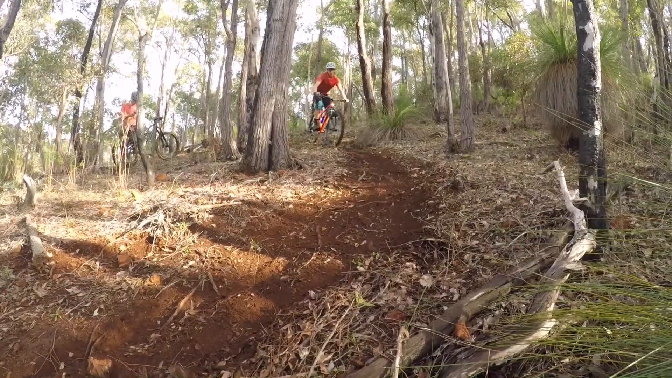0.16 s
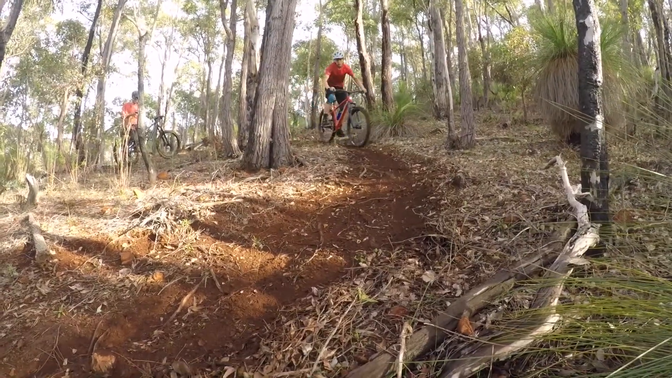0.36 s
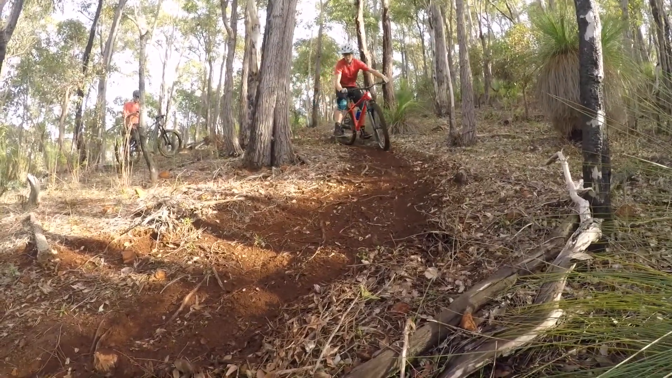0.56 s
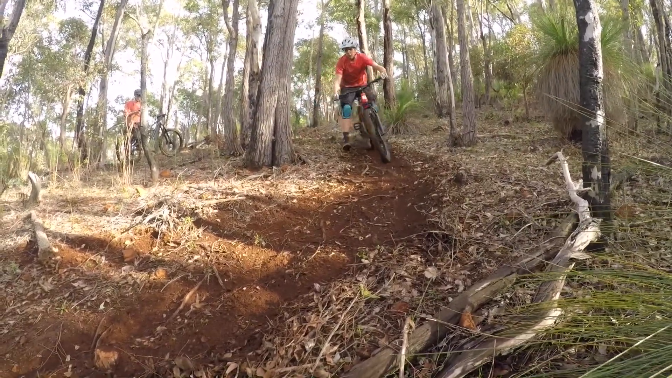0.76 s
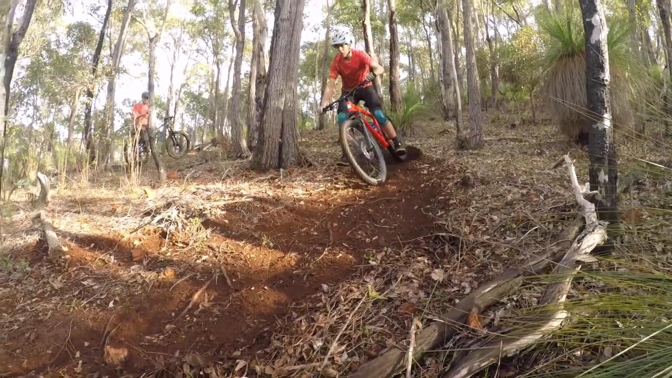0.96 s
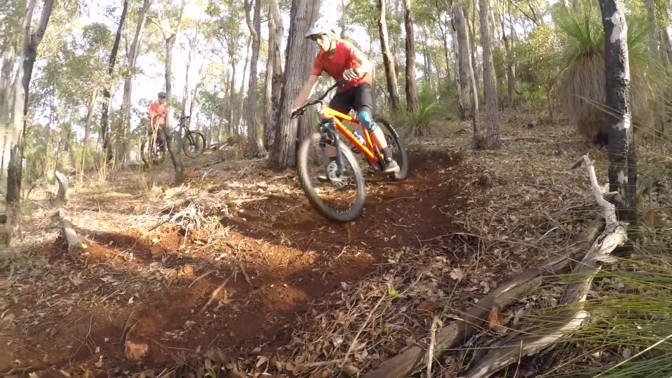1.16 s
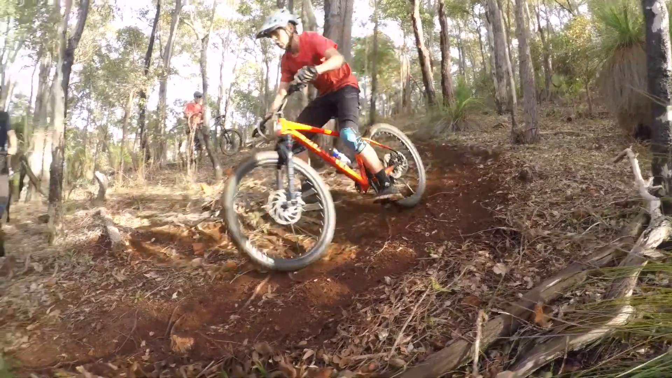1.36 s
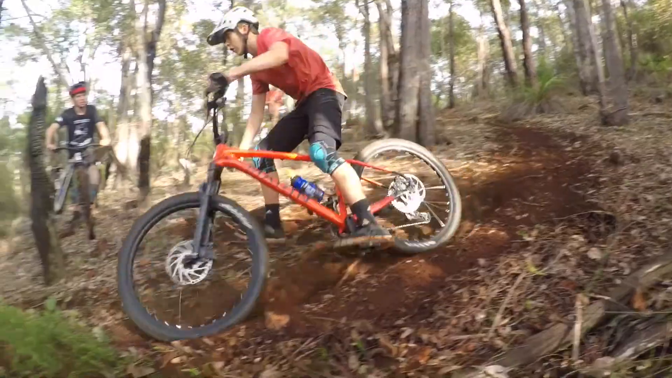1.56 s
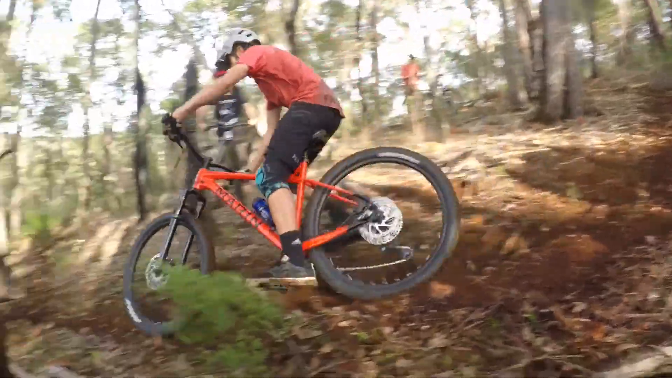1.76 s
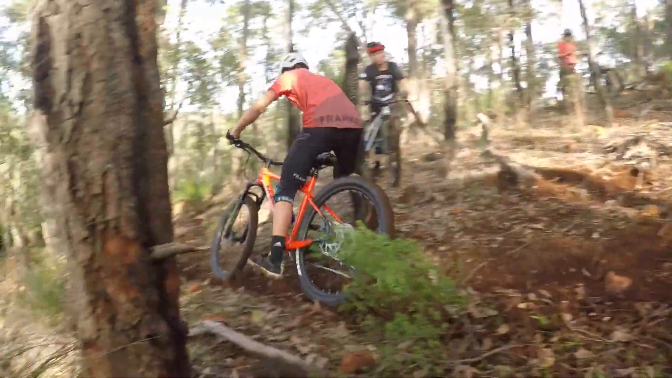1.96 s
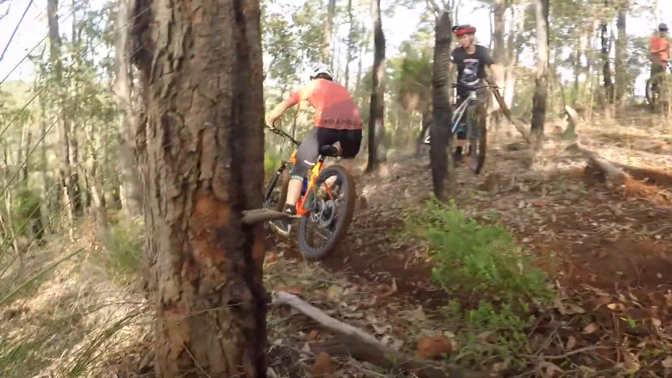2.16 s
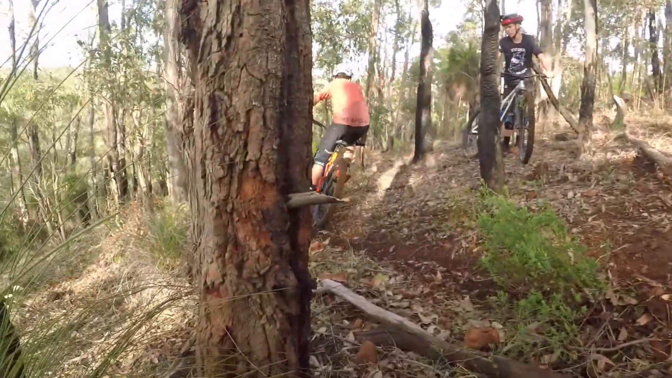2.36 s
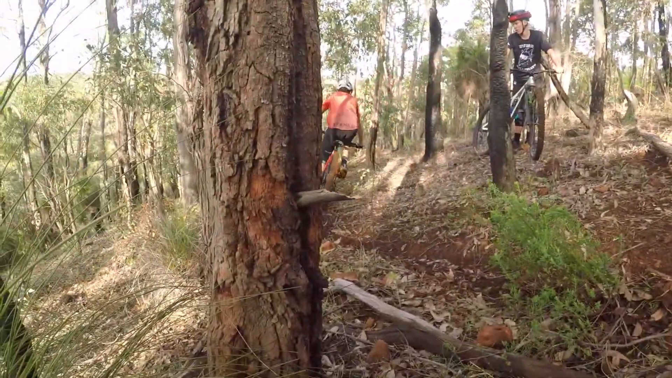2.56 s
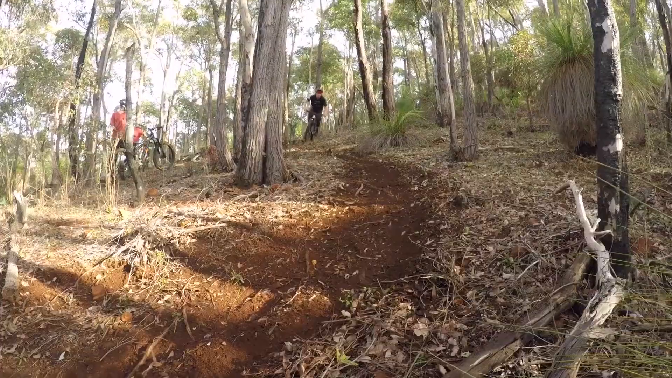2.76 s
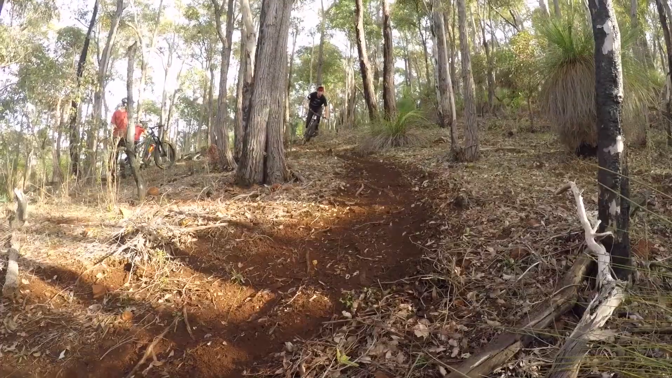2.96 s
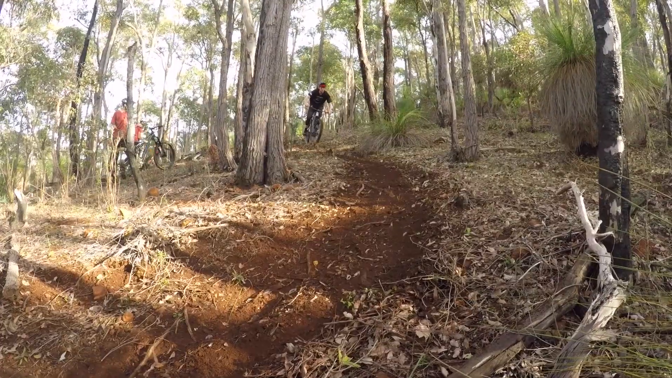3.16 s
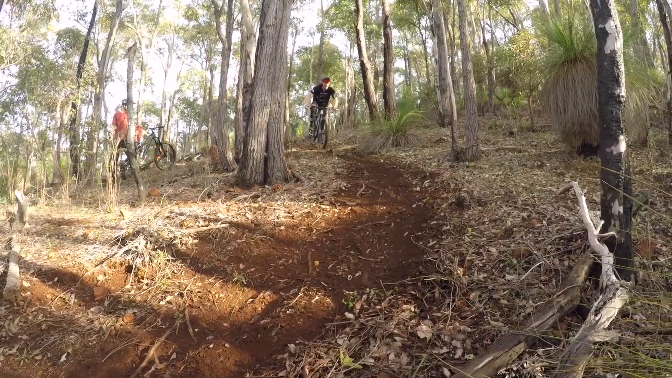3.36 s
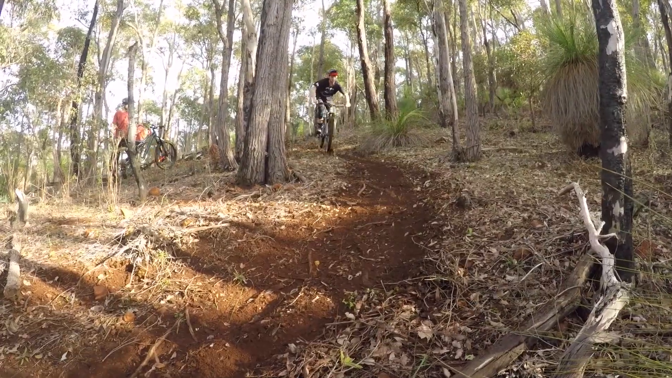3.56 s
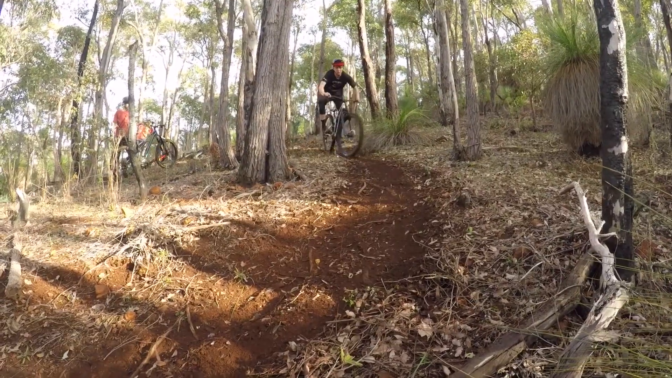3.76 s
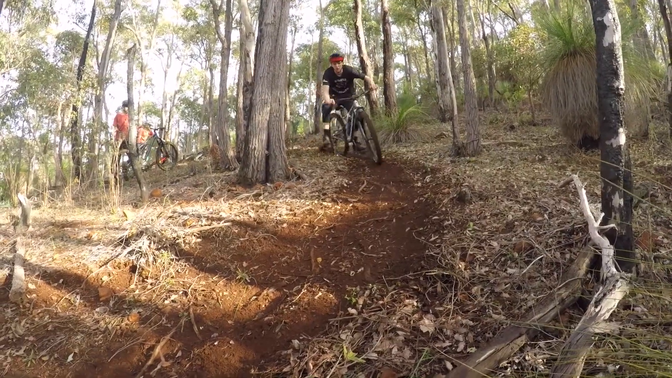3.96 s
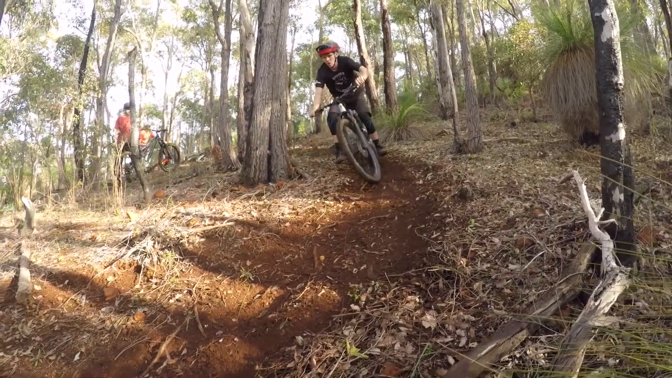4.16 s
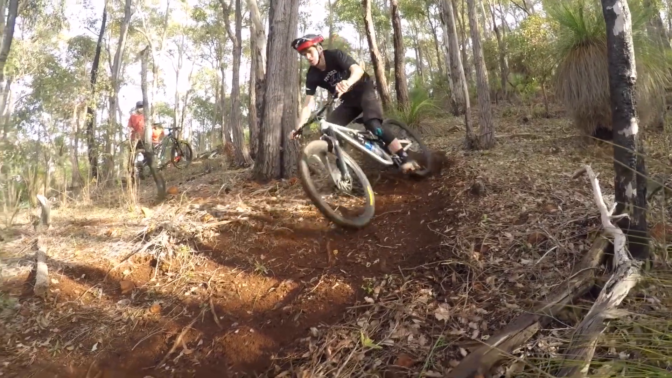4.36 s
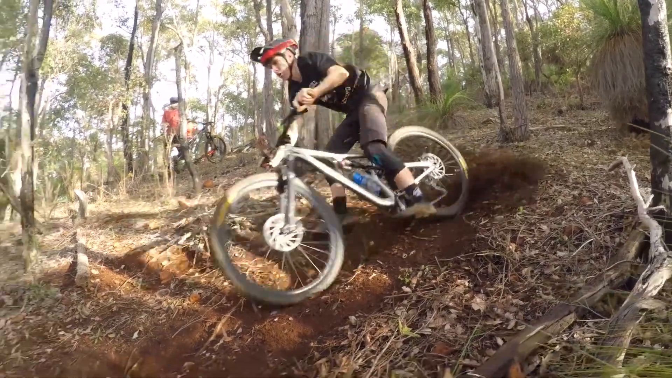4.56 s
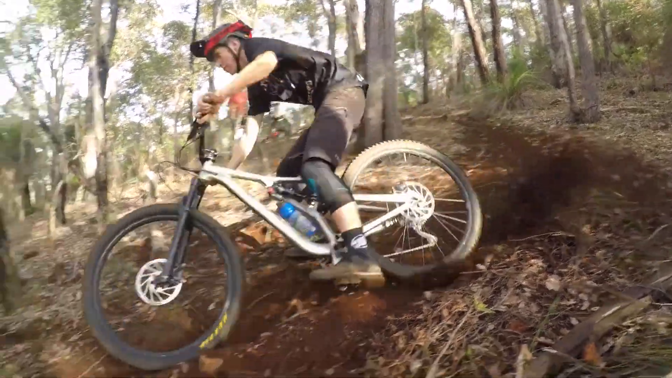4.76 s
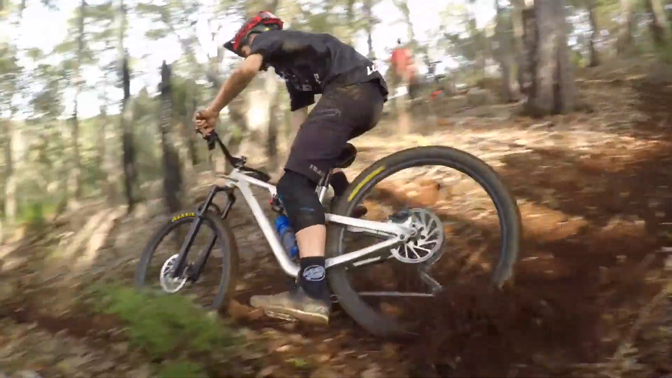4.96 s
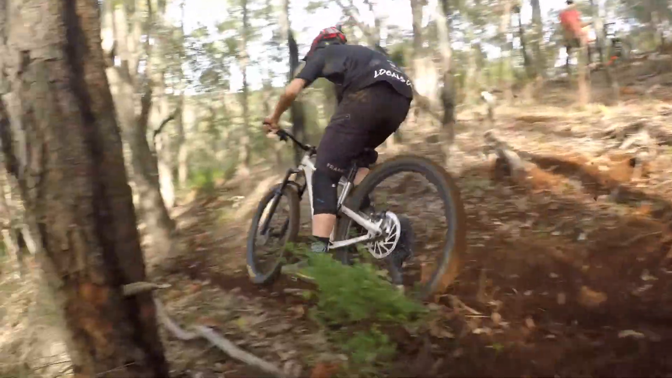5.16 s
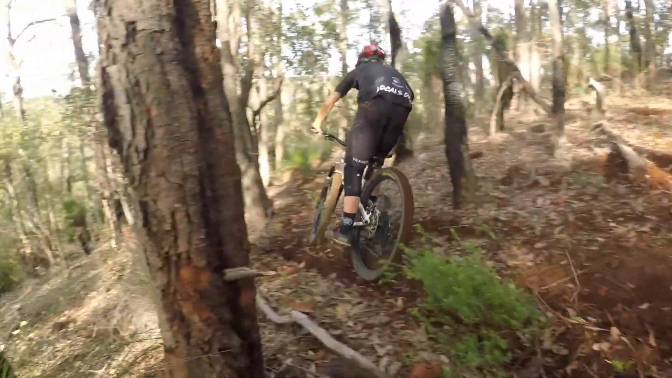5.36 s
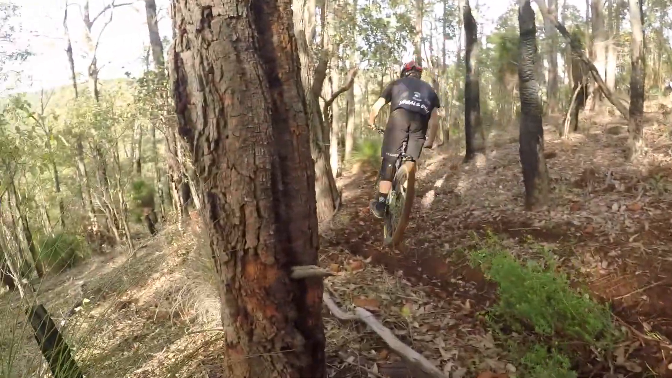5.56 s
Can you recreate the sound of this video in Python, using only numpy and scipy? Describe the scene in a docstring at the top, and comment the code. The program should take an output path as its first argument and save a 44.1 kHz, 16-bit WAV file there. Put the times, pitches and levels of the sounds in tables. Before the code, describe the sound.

Close outdoor sound on a dry forest trail, with low wind rumble on the microphone and faint leaf rustle. From 0 s a bike approaches with soft tyre noise and small chain clacks at 0.2-0.45 s. At about 1.1 s it swells fast: sharp frame clatter, wooden-sounding wheel knocks, thumps, cracking stones and gravelly crunch over low drumming, loudest from 1.2 to 1.9 s, with a very brief ringing wheel tone near 1.56 s. It drops quickly after 1.95 s, duller behind a trunk by 2.5 s, with one knock. At 2.63 s a click and a hundredth-second silence cut to near quiet. Sparse faint ticks lead to short gritty scrapes from 3.8 s; a second tyre skids past from 4.3 to 5.4 s, with knocks, hard clods and stones, and thick hissing soil spray strongest around 4.6-5.3 s. A short wind buffet hits at 5.2 s; spray thins to the end at about 5.6 s.

```python
"""Wind rumbles as a mountain bike drums over dirt and grit, then a second bike skids through the bend.
The tyres turn random tiny impacts into drumming, crunch and a spray of soil that swell as each bike passes.
Chain contacts, bumps and stones are short blows that ring; brakes, tread and a wheel give wavering tones.
Scrapes are short bursts of coloured grains, and wind is slow noise over rustling leaves.
A click and a very short silence part the two rides."""
import sys
import numpy as np
from scipy import signal
from scipy.fft import rfft, irfft, next_fast_len
from scipy.io import wavfile
from scipy.ndimage import uniform_filter1d, map_coordinates

SR = 44100
rng = np.random.default_rng(int(sys.argv[2]) if len(sys.argv) > 2 else 0)


def unload_audio(sound):
    """Save the sound as a 16-bit wav file, at the path given as the first command line argument."""
    columns = np.transpose(np.atleast_2d(sound))
    # keep every value between -1 and 1, then stretch to whole-number steps
    steps = np.round(np.clip(columns, -1, 1) * 32767)
    wavfile.write(sys.argv[1], SR, steps.astype(np.int16))


N = 247401  # length [samples]

# Event levels below are settings before the trims in the functions.
# Spectra give only a shape: they are scaled to unit power before use.

# Wind buffeting: (time [s], level [dB])
WIND_LEVEL = [(0.0, -37), (0.59, -38.5), (1.76, -28.5), (1.82, -35), (1.89, -26.5), (1.98, -45),
              (2.32, -39), (3.42, -43), (3.45, -35), (3.94, -43), (4.2, -32), (4.38, -36), (5.16, -32.5),
              (5.21, -20.5), (5.26, -37.5), (5.41, -44), (5.55, -26.5), (5.6, -45)]
# Wind rumble, then rustling leaves: (frequency [Hz], relative density [dB])
GUST_SPECTRUM = [(10, -5), (25, -5), (45, -5), (70, -10), (110, -15.5), (200, -34.5), (400, -39.5),
                 (1500, -64.5)]
LEAF_SPECTRUM = [(100, 15.5), (400, 5.5), (1000, -3), (2000, -3), (3300, -13.5), (4500, -9.5), (6200, -19),
                 (7300, -7.5), (9500, -4.5), (11500, -12.5), (15500, -56)]
HISS_DB = -87  # steady, very high hiss

# Each ride's tyres: (time [s], casing drumming [dB], tread crunch [dB], soil spray [dB])
FIRST_RIDE = [(0, -40, -50.5, -56), (0.3, -45.5, -48.5, -56), (0.4, -36.5, -42, -47.5),
              (0.58, -40, -42.5, -54.5), (0.94, -37, -42, -52), (1.15, -30.5, -43, -44.5),
              (1.23, -31.5, -33.5, -47), (1.33, -31, -28.5, -45.5), (1.395, -43, -37.5, -46),
              (1.445, -27, -29.5, -41), (1.48, -22.5, -29.5, -39.5), (1.525, -24, -32, -39),
              (1.58, -21, -31.5, -31.5), (1.635, -24.5, -36, -36), (1.7, -25.5, -31.5, -32),
              (1.725, -24, -33.5, -42.5), (1.8, -27, -39.5, -39), (1.88, -30, -32, -33),
              (1.94, -37, -42.5, -44), (2.03, -41.5, -48, -41), (2.11, -46, -47.5, -46),
              (2.27, -43, -45.5, -48), (2.4, -45, -49, -54), (2.62, -46, -47.5, -51.5)]
SECOND_RIDE = [(2.66, -49, -60, -64.5), (3.1, -48, -53, -60.5), (3.7, -42.5, -51, -58.5),
               (3.82, -42.5, -44, -53), (3.95, -39.5, -42.5, -56), (4.08, -34, -38, -49.5),
               (4.29, -32.5, -36, -48.5), (4.35, -31.5, -33, -40.5), (4.47, -32.5, -35.5, -39.5),
               (4.59, -27.5, -36, -36), (4.65, -34, -33, -33), (4.73, -33, -33, -34.5),
               (4.85, -27.5, -38.5, -31.5), (5.08, -32, -40.5, -32.5), (5.2, -32, -43, -31),
               (5.27, -32, -38, -28.5), (5.4, -35, -46, -37.5), (5.5, -39, -44.5, -42),
               (5.6, -36.5, -45, -42.5)]
# Tyre casing, firmer on the first bike: (frequency [Hz], relative density [dB])
FIRM_CASING = [(35, -37.5), (65, 5), (105, -1.5), (170, 2.5), (220, 1), (340, -16), (600, -29.5),
               (1500, -56)]
CASING = [(35, -18), (65, 4), (105, 0.5), (170, 0), (250, -1.5), (340, -14.5), (600, -33), (1500, -60)]
# Grinding tread of the first and second ride: (frequency [Hz], relative density [dB])
FIRST_TREAD = [(120, -31.5), (310, 0), (390, 7), (440, 0), (500, 2), (620, 1.5), (730, 0.5), (900, -6),
               (1060, -6), (1320, -3.5), (1700, -10.5), (3000, -19), (7000, -50), (15000, -61)]
SECOND_TREAD = [(120, -24), (300, -0.5), (400, -1), (530, 2.5), (640, 1), (740, -8), (880, -3.5),
                (1100, -6), (1350, -9), (1800, -12.5), (3000, -16.5), (7000, -26), (15000, -47)]
# Thin spray, thick spray and fine dust: (frequency [Hz], relative density [dB])
THIN_SPRAY = [(700, -15.5), (1500, 2), (2100, -1), (2600, 3), (3200, -2), (3700, 0.5), (4500, 1.5),
              (5300, -1), (6500, 0), (7500, -7), (9200, -10.5), (11000, -23), (15500, -33)]
THICK_SPRAY = [(500, -8.5), (1200, 5.5), (1700, 2.5), (2400, 1), (4000, 1.5), (5100, 3), (6100, 5),
               (6800, 4), (7600, -2.5), (9000, -4.5), (10300, -17.5), (11300, -19), (15500, -45)]
DUST_SPECTRUM = [(9000, -57), (11400, -17), (12200, -3), (13200, -7), (15500, -14), (17000, -28)]
NEAR_DUST_DB = 5  # fine dust is heard best while the rear wheel is close
# The first rider slips behind a trunk: (starts [s], half hidden [s], fully hidden [s])
BEHIND_TREE = (2.28, 2.39, 2.56)

# Chain and stones strike the frame; clank and brightness are relative to the level:
# (time [s], level [dB], clank [dB], brightness [dB], time to fall 60 dB [s])
CLACK_EVENTS = [(0.2054, -36.5, -20, -22, 0.052), (0.2625, -38.5, -2, -10.5, 0.029),
                (0.3555, -25.5, -6, -25.5, 0.05), (0.401, -26.5, -10, -28, 0.035),
                (0.447, -34.5, -13, -26, 0.07), (0.636, -36.5, -7, -28, 0.14),
                (0.987, -27.5, -15, -21, 0.066), (1.0106, -29.5, -7, -25, 0.25),
                (1.091, -22, -5.5, -45, 0.04), (1.1899, -16, -5, -28, 0.061),
                (1.3063, -40, -11, -10.5, 0.058), (1.5354, -10.5, -11, -22.5, 0.061),
                (1.5615, -18, -4, -20, 0.072), (1.651, -22, -27, -19, 0.079),
                (1.738, -20, -3.5, -20, 0.068), (1.7799, -26, -22, -16.5, 0.063),
                (1.853, -25, -9, -25, 0.11), (3.099, -46.5, -1, -12, 0.05), (3.117, -45, -1, -15, 0.073),
                (3.421, -42.5, -1, -13, 0.041), (3.8383, -35, -5, -21, 0.048),
                (4.196, -33.5, -23, -20, 0.15), (4.337, -26, -8, -18, 0.064),
                (4.9575, -23, -26, -16, 0.097), (5.4563, -25.5, -6.5, -20, 0.045)]
# Resonances of frame, lower clank and chain: (frequency [Hz], width [Hz], level [dB])
FRAME_MODES = [(2234, 380, -0.5), (2380, 106, 4), (2645, 190, 4.5), (3120, 790, -1.5), (3550, 66, -4),
               (3674, 34, 5.5), (3890, 170, 4), (4500, 500, -4)]
CLANK_MODES = [(1188, 52, 12.5), (1275, 126, 7), (1360, 190, 11), (1920, 1450, 0)]
CHAIN_MODES = [(5680, 780, 6.5), (6370, 340, 10), (6440, 240, 14), (7250, 690, -5)]
# Bright tick of a contact: (frequency [Hz], relative density [dB])
TICK_SPECTRUM = [(4000, -45), (7000, 8), (9000, 11), (11000, -5), (13000, 2), (15500, -24)]
TICK_T60 = 0.061  # time to fall 60 dB [s]

# Short wavering tones: brake squeaks, tread groans and, at 1.56 s, a ringing wheel:
# (time [s], length [s], pitch [Hz], level [dB], line width [Hz])
WAVERING_EVENTS = [(0.207, 0.028, 3490, -48.5, 56), (1.195, 0.046, 436, -27.5, 7.7),
                   (1.252, 0.048, 422, -31.5, 22), (1.56, 0.05, 1240, -33, 15),
                   (1.645, 0.054, 2740, -44, 40), (1.853, 0.031, 1160, -39, 15),
                   (1.99, 0.052, 4640, -47.5, 25), (2.251, 0.117, 2570, -56, 1.5),
                   (2.422, 0.012, 2330, -51, 90), (2.628, 0.004, 4500, -43, 540),
                   (5.004, 0.0078, 6000, -30, 220)]

# Stones and hard clods crack, smaller ones higher; the pair near 1.536 s is a struck frame ringing:
# (time [s], level [dB], pitch [Hz])
CRACK_EVENTS = [(0.2076, -35, 3450), (0.3584, -29, 3060), (0.537, -31, 1510), (0.6378, -30, 2270),
                (0.867, -30.5, 2510), (0.9882, -31, 1830), (1.11, -22.5, 700), (1.191, -14, 2700),
                (1.1915, -17, 1380), (1.2043, -19, 1230), (1.276, -20.5, 1570), (1.3058, -19, 970),
                (1.307, -25, 7200), (1.5032, -17, 1190), (1.5362, -10, 1470), (1.5368, -12, 3470),
                (1.5767, -20, 1320), (1.595, -23, 450), (1.653, -22, 2690), (1.7079, -18, 6000),
                (1.7427, -23, 2800), (1.7816, -23, 3100), (1.8493, -23, 820), (1.855, -22, 1140),
                (1.8655, -17, 1080), (1.8795, -23, 2470), (1.9968, -26.5, 1330), (2.1782, -34, 2330),
                (2.3958, -34.5, 4780), (2.5737, -38, 7100), (2.753, -41, 3930), (3.2793, -40, 2700),
                (3.3856, -35, 1280), (3.421, -39, 2760), (3.5451, -34, 1000), (3.965, -21, 383),
                (4.0223, -25.5, 910), (4.1729, -25, 594), (4.198, -27, 3600), (4.2306, -24.5, 4100),
                (4.2972, -26, 865), (4.3316, -18, 930), (4.3875, -15, 1150), (4.432, -26, 1010),
                (4.5207, -20, 1540), (4.5388, -12.5, 1160), (4.5637, -17, 573), (4.6287, -25, 3740),
                (4.8028, -19, 4070), (4.863, -22, 5200), (4.876, -24, 4800), (4.8927, -18, 794),
                (4.909, -15.5, 624), (4.9593, -16, 2820), (5.0302, -17.5, 750), (5.1275, -16, 5430),
                (5.1313, -16, 1720), (5.268, -23, 1640), (5.3152, -22, 2870), (5.3211, -17, 2900),
                (5.329, -18, 2800), (5.3515, -22, 1690), (5.4229, -22, 3560), (5.458, -22, 736),
                (5.4778, -17.5, 4560)]
# Ringing modes of each crack: (multiple of its pitch [ratio], level [dB])
CRACK_MODES = [(0.6, -10.5), (1, -2), (1.37, -11.5), (2.1, -16.5)]
CRACK_T60 = 0.016  # fall of 60 dB for a pitch of 1 kHz [s]

# Wheels hit roots and ruts; rattle is relative to the level, thump stands alone:
# (time [s], level [dB], knock pitch [Hz], rattle [dB], thump [dB], casing note [Hz])
BUMP_EVENTS = [(0.594, -41, 326, -9, -27, 168), (0.632, -24, 530, -17, -33, 163),
               (1.134, -19, 630, -12, -44, 190), (1.193, -12.5, 380, -11, -21.5, 177),
               (1.209, -18.5, 450, -7, -26, 202), (1.27, -22, 437, -2.5, -27, 188),
               (1.303, -22.5, 570, -2.5, -24, 205), (1.366, -28, 418, -24, -17, 152),
               (1.46, -16, 437, -13, -26, 199), (1.475, -11, 430, -20, -24, 198),
               (1.501, -26, 350, -7, -21, 129), (1.57, -14.5, 367, -1.5, -29, 172),
               (1.581, -18.5, 590, -1, -23, 161), (1.735, -13, 427, -12, -34, 186),
               (1.756, -15.5, 386, -8, -17, 179), (1.777, -25, 386, -12.5, -16, 184),
               (1.854, -11, 294, -8.5, -14, 164), (1.863, -18, 600, -13, -15, 223),
               (2.557, -16.5, 623, -27, -39, 157), (3.458, -25.5, 347, -26, -25, 124),
               (4.021, -23, 567, -12, -33, 186), (4.171, -23, 565, -14, -28.5, 187),
               (4.294, -17, 417, -16, -28, 133), (4.388, -11.5, 567, -10, -31, 227),
               (4.408, -12.5, 477, -26, -18, 223), (4.523, -15, 540, -13, -24.5, 253),
               (4.539, -8, 525, -27, -24, 254), (4.616, -17, 323, -20, -19.5, 248),
               (4.674, -12, 520, -21, -20.5, 169), (4.724, -24, 500, -19, -17, 195),
               (4.778, -26, 388, -8, -15, 154), (4.949, -11, 300, -18, -22, 143),
               (5.158, -29, 330, -21, -20, 121)]
# Resonances of a wheel: (frequency [Hz], width [Hz], level [dB])
WHEEL_MODES = [(448, 88, 4.5), (594, 36, 9), (752, 57, 10), (894, 160, 5.5), (1190, 170, 1), (1300, 75, 12),
               (1354, 460, 4)]
RATTLE_T60, KNOCK_T60, THUMP_T60 = 0.091, 0.039, 0.14  # times to fall 60 dB [s]

# The tread tears dirt loose; coarse gravel is low, fine soil high:
# (time [s], length [s], level [dB], centre [Hz])
SCRAPE_EVENTS = [(1.416, 0.035, -42, 990), (1.499, 0.011, -29, 1400), (1.59, 0.048, -36, 1300),
                 (1.65, 0.018, -36, 3000), (1.677, 0.02, -41, 3200), (1.693, 0.018, -32, 750),
                 (1.846, 0.029, -28.5, 1100), (2.262, 0.016, -46, 4500), (2.463, 0.016, -54.5, 5300),
                 (3.762, 0.016, -40, 540), (3.802, 0.041, -46, 950), (3.872, 0.013, -35, 560),
                 (4.02, 0.017, -39, 940), (4.015, 0.022, -45, 3400), (4.076, 0.013, -34.5, 900),
                 (4.09, 0.025, -34.5, 680), (4.133, 0.011, -34, 900), (4.168, 0.017, -34, 800),
                 (4.195, 0.008, -33, 5170), (4.286, 0.024, -32, 766), (4.623, 0.016, -32, 5600),
                 (4.761, 0.017, -35, 4000), (4.778, 0.034, -33.5, 4500), (4.86, 0.022, -36, 5600),
                 (4.93, 0.026, -31.5, 5500), (5.225, 0.04, -33, 6030), (5.247, 0.035, -36, 5630)]
SCRAPE_Q, SCRAPE_RISE_S = 1.8, 0.0022  # sharpness of the colour; speed of the bite [s]

# The silence between the rides: (starts [s], ends [s])
SILENCE = (2.632, 2.643)
CUT_CLICK_DB, CUT_SWELL_S = -26, 0.0062  # low swell that the silence cuts into a click [dB], [s]
RETURN_S = 0.008  # fade-in after the silence [s]
TOP_HZ = 15400  # nothing is kept from here up

# Treble unlike on the two sides: (frequency [Hz], unrelated share [dB])
SIDE_SHARE = [(8000, -43.5), (10500, -38), (12000, 0), (15500, 2)]
# Shared treble: (frequency [Hz], right minus left [dB])
RIGHT_LEAD = [(8000, 0), (10500, 0), (12000, 4), (15500, 16)]


def amp(db):
    """Turn decibels into gain."""
    return 10 ** (np.asarray(db) / 20)


def unit(x):
    """Scale a sound to rms 1."""
    return x / np.sqrt(np.mean(x ** 2) + 1e-20)


def along(points, hz):
    """Read (frequency, value) points on a log frequency axis."""
    f, v = np.transpose(points)
    return np.interp(np.log(hz + 1), np.log(f + 1), v)


def curves(rows):
    """Give one value per sample for each column after the time."""
    s, *columns = np.transpose(rows)
    return [np.interp(np.arange(N) / SR, s, column) for column in columns]


def wobble(rate):
    """A smooth random curve with this many knots a second."""
    knots = rng.standard_normal(N // 20)
    return map_coordinates(knots, [np.arange(N) * rate / SR], mode="wrap")


def filtered(x, response):
    """Shape a sound by a complex response of frequency."""
    m = 2 * next_fast_len(N // 2 + SR // 4)
    return irfft(rfft(x, m) * response(np.fft.rfftfreq(m, 1 / SR)), m)[..., :N]


def colour(points):
    """A response with this spectrum and unit power that acts only after each impact."""
    def response(hz):
        # folding the cepstrum forward in time gives minimum phase
        cepstrum = irfft(np.log(amp(along(points, hz))))
        cepstrum[1:len(hz) - 1] *= 2
        cepstrum[len(hz):] = 0
        h = np.exp(rfft(cepstrum))
        return h / np.sqrt(np.mean(abs(h) ** 2))
    return response


def body(modes):
    """A set of resonances with alternating sign and unit power together."""
    def response(f):
        h = 0
        for k, (centre, width, db) in enumerate(modes):
            resonance = 1j * f * width / (centre * centre - f * f + 1j * f * width)
            h = h + (-1) ** k * amp(db) * resonance
        return h / np.sqrt(np.mean(abs(h) ** 2))
    return response


def dulled(x, share, corner_hz):
    """Take away a share of the treble above the corner."""
    treble = filtered(x, lambda hz: 1 - 1 / (1 + (hz / corner_hz) ** 16))
    return x - np.clip(share, 0, 1) * treble


def grains(rate, spread_db):
    """Random tiny impacts of unequal size, about rate a second, with rms 1."""
    size = amp(spread_db * np.clip(rng.standard_normal(N), -2, 2))
    size = size * np.sign(rng.standard_normal(N))
    return unit(size * (rng.random(N) < rate / SR))


def knocks(times, levels_db, pitches, t60s):
    """Each blow sets off one damped tone."""
    out = np.zeros(N + SR)
    for s, db, hz, t60 in np.broadcast(times, levels_db, pitches, np.clip(t60s, .002, .5)):
        t = np.arange(int(t60 * SR)) / SR
        tone = amp(db - 60 * t / t60) * np.sin(2 * np.pi * hz * t)
        out[round(s * SR):][:len(t)] += tone
    return out[:N]


def bursts(times, levels_db, t60s, crack_db):
    """Each contact is one hard blow followed by a rough chatter that dies away."""
    out, t = np.zeros(N + SR), np.arange(SR // 4) / SR
    for s, db, t60 in np.broadcast(times, levels_db, t60s):
        chatter = amp(db - 60 * t / max(t60, .005)) * rng.standard_normal(len(t))
        chatter[0] = amp(crack_db) * np.linalg.norm(chatter)  # the hard blow
        out[round(s * SR):][:len(t)] += chatter
    return out[:N]


def clods(pitch_hz, spread, t60, size_db, count):
    """Lumps of hard earth knock at random moments, each at its own pitch; rms 1."""
    when = rng.random(count) * N / SR
    pitch, size = np.clip(rng.standard_normal((count, 2)), -2, 2).T
    hz = pitch_hz * np.exp(spread * pitch)
    level_db = size_db * size - 10 * np.log10(hz / pitch_hz)  # higher lumps are quieter
    return unit(knocks(when, level_db, hz, t60 * np.sqrt(pitch_hz / hz)))


def wind():
    """Lumpy wind noise rumbles on the microphone, over a faint rustle of leaves and a thin hiss."""
    buffet_db, = curves(WIND_LEVEL)
    eddies = filtered(rng.standard_normal(N), colour(GUST_SPECTRUM))
    # even out the strength, so that the table sets each gust
    strength = np.sqrt(abs(uniform_filter1d(eddies ** 2, size=SR // 8)) + 1e-6)
    buffet = eddies / strength
    leaves = filtered(rng.standard_normal(N), colour(LEAF_SPECTRUM))
    leaves = leaves * amp(0.42 * wobble(4.9) + 0.29 * wobble(24.1))
    hiss = filtered(grains(5000, 4), colour(DUST_SPECTRUM))
    return amp(buffet_db + 4.0) * buffet + amp(-51.0) * leaves + amp(HISS_DB) * hiss


def tyres(ride, near_s, casing, tread, soil, drum_db, crunch_db, spray_db, dust_db,
          pebble_db, clump_db, grain_rate):
    """Uneven ground loads the tyres in jerks that drive drumming, crunch, spray and dust together."""
    drumming, crunching, spraying = curves(ride)
    t = np.arange(N) / SR
    near = (np.tanh((t - near_s[0]) / 0.046) - np.tanh((t - near_s[1]) / 0.1)) / 2
    dusting = spraying + near * (NEAR_DUST_DB + 0.5 * wobble(20))
    load = 1.9 * np.tanh(0.61 * (wobble(45) + wobble(120)))

    drum = unit(filtered(grains(600, 2.56) * amp(1.0 * load), colour(casing)))
    crunch = unit(filtered(grains(2000, 2.6) * amp(clump_db * load), colour(tread)))
    lumps = clods(pitch_hz=671.0, spread=0.42, t60=0.04, size_db=1.4, count=760)
    crunch = unit(crunch + amp(-2.5) * lumps)

    clumps = amp(0.46 * clump_db * load + 0.95 * wobble(210))  # soil flies in clods
    # coarse crumbs land on dry leaves, some with a pitched tick
    crumb_ticks = clods(pitch_hz=4900, spread=0.36, t60=0.007, size_db=2.5, count=2600)
    spatter = amp(-7) * grains(600, 3.8) + amp(-9.5) * crumb_ticks
    spray = unit(filtered(grains(grain_rate, 3.3) * clumps + spatter, colour(soil)))
    dust = unit(filtered(grains(grain_rate, 5.1) * clumps, colour(DUST_SPECTRUM)))
    pebbles = unit(filtered(grains(150, 2.9), body(FRAME_MODES)))  # single stones tick on the bike

    ground = amp(drumming + drum_db) * drum + amp(crunching + crunch_db) * crunch
    flying = amp(spraying + spray_db) * (spray + amp(pebble_db) * pebbles)
    return ground + flying + amp(dusting + dust_db) * dust


def riders():
    """The first rider carves and is dulled behind a trunk; the second drifts and throws thick soil."""
    t = np.arange(N) / SR
    first = tyres(FIRST_RIDE, (1.63, 2.35), FIRM_CASING, FIRST_TREAD, THIN_SPRAY,
                  drum_db=-1.4, crunch_db=0.55, spray_db=0.5, dust_db=-24.5,
                  pebble_db=-11.0, clump_db=1.96, grain_rate=7000)
    # the trunk takes away high treble first, then more from lower down
    first = dulled(first, np.interp(t, BEHIND_TREE, [0, 0.75, 0.8]), corner_hz=5350)
    first = dulled(first, np.interp(t, BEHIND_TREE, [0, 0, 0.6]), corner_hz=4100)
    second = tyres(SECOND_RIDE, (4.56, 5.42), CASING, SECOND_TREAD, THICK_SPRAY,
                   drum_db=0.34, crunch_db=1.7, spray_db=1.0, dust_db=-21.5,
                   pebble_db=-9, clump_db=1.8, grain_rate=9000)
    return np.where(t < SILENCE[0], first, second)


def clacks():
    """Sharp contacts ring the frame over a lower clank, with a high chain ring and a short tick."""
    s, db, clank_db, bright_db, t60 = np.transpose(CLACK_EVENTS)
    ring = filtered(bursts(s, db - 8.0, t60, crack_db=-15.0), body(FRAME_MODES))
    ring = dulled(ring, 1, corner_hz=9000)
    clank = filtered(bursts(s, db + clank_db - 3.0, t60, crack_db=-2.5), body(CLANK_MODES))
    clank = dulled(clank, 0.84, corner_hz=5000)
    high = filtered(bursts(s, db + bright_db + 7, t60, crack_db=-33), body(CHAIN_MODES))
    tick = filtered(bursts(s, db + bright_db - 3, TICK_T60, crack_db=0), colour(TICK_SPECTRUM))
    return ring + clank + high + tick


def wavering_tones():
    """Brake squeaks, tread groans and a ringing wheel: short tones whose phase wanders."""
    out = np.zeros(N + SR)
    for s, length, hz, db, width in WAVERING_EVENTS:
        count = max(int(length * SR), 16)
        drift = np.sqrt(2 * np.pi * width / SR) * np.cumsum(rng.standard_normal(count))
        tone = np.sin(2 * np.pi * hz * np.arange(count) / SR + drift)
        out[round(s * SR):][:count] += amp(db + 5.0) * signal.windows.tukey(count, .5) * tone
    return out[:N]


def cracks():
    """Stones, clods and one struck frame ring in a few modes that die sooner when pitched high."""
    s, db, hz = np.transpose(CRACK_EVENTS)
    t60 = CRACK_T60 * np.sqrt(1000 / hz)
    shape = np.exp(0.039 * rng.standard_normal((len(s), len(CRACK_MODES))))  # no two are alike
    ringing = np.zeros(N)
    for k, (multiple, level_db) in enumerate(CRACK_MODES):
        ringing += knocks(s, db + level_db, hz * multiple * shape[:, k], t60)
    return dulled(ringing, 0.76, corner_hz=8000)


def bumps():
    """A bump rattles the wheel, knocks at its own pitch and thumps the casing; rubber softens it."""
    s, db, knock_hz, rattle_db, thump_db, casing_hz = np.transpose(BUMP_EVENTS)
    rattle = filtered(bursts(s, db + rattle_db - 5.0, RATTLE_T60, crack_db=-2.5), body(WHEEL_MODES))
    thud = filtered(bursts(s, thump_db - 6.5, THUMP_T60, crack_db=-10.5), colour(CASING))
    knock = knocks(s, db - 5.5, knock_hz, KNOCK_T60)
    casing_note = knocks(s, thump_db - 0.5, casing_hz, THUMP_T60)
    return dulled(rattle + thud + knock + casing_note, 0.92, corner_hz=5500)


def scrapes():
    """Each bite of the tread is a burst of grains, coloured by their size, that starts sharply."""
    out = np.zeros(N)
    grit = grains(7000, 3.1)
    t = np.arange(SR // 8) / SR
    for s, length, db, hz in SCRAPE_EVENTS:
        span = slice(round(s * SR), round(s * SR) + len(t))
        stretch = 1 + 0.5 / SCRAPE_Q
        edges = np.clip([hz / stretch, hz * stretch], 50, SR / 2 - 50)
        band = signal.butter(2, edges, "band", fs=SR, output="sos")
        envelope = (1 - np.exp(-t / SCRAPE_RISE_S)) * np.exp(-(t / length) ** 4)
        out[span] += amp(db) * unit(signal.sosfilt(band, grit[span])) * envelope
    return out


def trunks(x, wet_db, t60):
    """Tree trunks scatter a faint, short echo, made from fading noise."""
    t = np.arange(SR // 2) / SR
    tail = rng.standard_normal(len(t)) * amp(-60 * t / t60) * (1 - np.exp(-t / 0.0041))
    return x + amp(wet_db) * signal.fftconvolve(x, tail / np.linalg.norm(tail))[:N]


def scene():
    """Mix all sounds alike on left and right, except for the top treble."""
    contacts = clacks() + bumps() + cracks() + wavering_tones()
    mid = riders() + scrapes() + trunks(contacts, wet_db=-11.0, t60=0.16) + wind()
    hz, _, z = signal.stft(mid, SR, nperseg=128)
    lean = np.tanh(along(RIGHT_LEAD, hz) * np.log(10) / 40)  # level difference to side share
    random_phase = np.exp(2j * np.pi * rng.random(z.shape))
    unrelated = amp(along(SIDE_SHARE, hz))[:, None] * random_phase
    side = signal.istft(z * (unrelated - lean[:, None]), SR, nperseg=128)[1][:N]
    side = filtered(side, lambda f: 1 - 1 / (1 + (f / 7500) ** 14))  # treble only
    return np.array([mid + side, mid - side])  # left, right


def record(dry):
    """Cut the sound with a click and a brief silence between the rides, then limit the band."""
    t = np.arange(N) / SR
    swell = amp(CUT_CLICK_DB) * np.exp(-abs(t - SILENCE[0]) / CUT_SWELL_S)
    before = (dry + swell) * (t < SILENCE[0])
    after = dry * np.clip((t - SILENCE[1]) / RETURN_S, 0, 1)
    return filtered(before + after, lambda hz: hz < TOP_HZ)


dry = scene()
out = record(dry)
unload_audio(out)
```